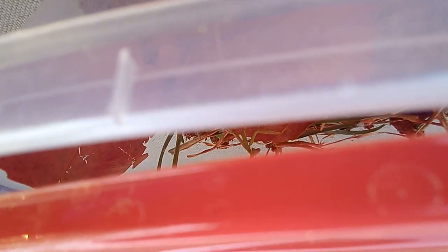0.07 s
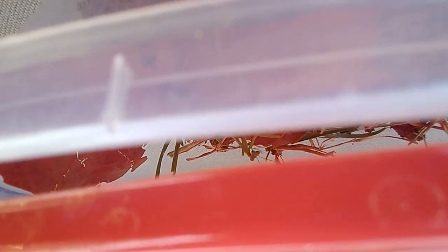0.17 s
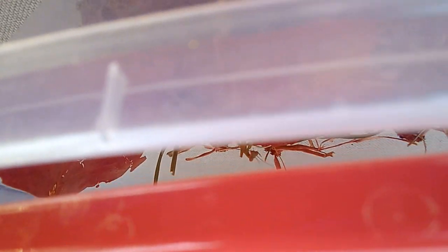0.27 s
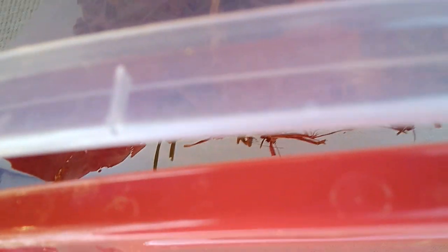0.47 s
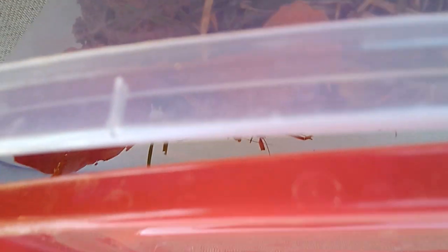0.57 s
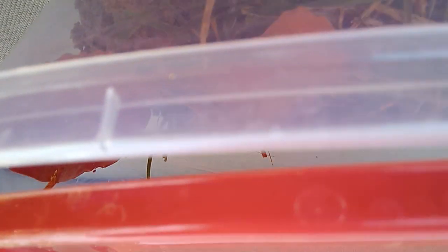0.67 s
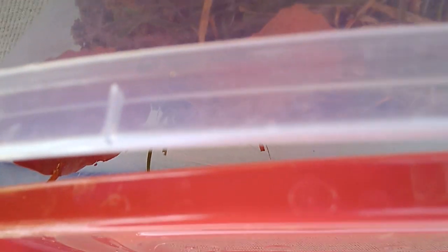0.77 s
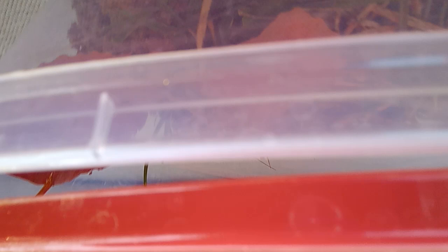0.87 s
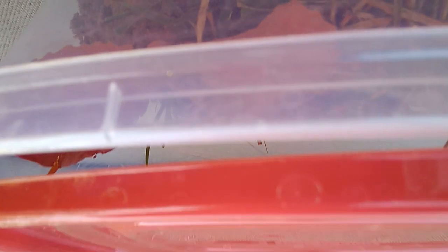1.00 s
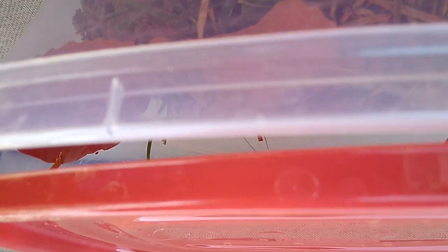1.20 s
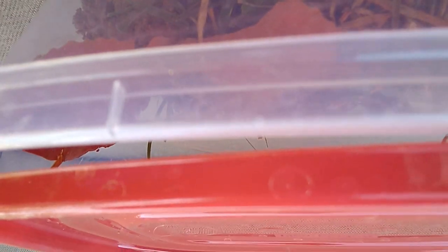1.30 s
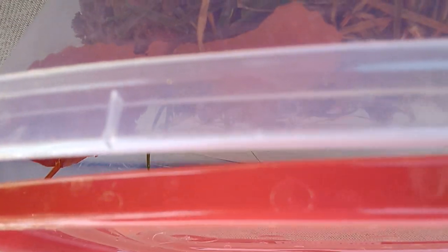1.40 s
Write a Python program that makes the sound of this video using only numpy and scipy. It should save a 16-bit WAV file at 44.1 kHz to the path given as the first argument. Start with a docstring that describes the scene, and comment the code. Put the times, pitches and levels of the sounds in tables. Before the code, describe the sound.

A plastic lid is pressed onto a tub close to the microphone. Two sharp snaps lead into soft hollow knocks and faint scraping, then two more snaps. Dry twigs tick faintly inside, over a low room hum.

```python
"""A plastic lid snaps and knocks as it is pressed and shifted on a plastic tub of dry twigs, close by.
The rim sticks and slips; each release is an impulse that excites damped modes of the wall and cavity.
Bending waves in the thin wall are dispersive, so the treble arrives ahead of the bass.
Between snaps the lid slides and creaks and the twigs rustle and tick, over a low room hum."""
import sys
import numpy as np
from scipy import signal
from scipy.fft import rfft, irfft
from scipy.io import wavfile
from scipy.ndimage import uniform_filter1d, minimum_filter1d

SR = 44100
rng = np.random.default_rng(int(sys.argv[2]) if len(sys.argv) > 2 else 0)


def inscribe(sig):
    """Save sig as 16-bit PCM at rate SR to the path in sys.argv[1].

    A 1-D sig is mono; a 2-D sig holds one channel per row.
    Samples are clipped to [-1, 1] before scaling.
    """
    pcm = np.round(np.clip(np.atleast_2d(sig).T, -1, 1) * 32767)
    wavfile.write(sys.argv[1], SR, pcm.astype(np.int16))


N = 63945
SIZE = 2 * N
FREQ = np.maximum(np.arange(N + 1) * SR / SIZE, 1e-3)
TIME = np.arange(N) / SR


def rim_snaps(wall, cavity, crack):
    """Stick-slip release: a first slip, then an impulse that thuds, rings the wall and cracks."""
    # (time [s], thud [dB], thud pitch [Hz], wall ring [dB], crack [dB], contact cutoff [Hz],
    #  lead of the first slip [s], its signed share [ratio])
    releases = [(0.218, 8, 1420, 1.5, 7, 12500, .00049, 0.46),
                (.2221, 14.5, 990, 5.5, 6.5, 8040, .00038, 0.23),
                (.2730, 8, 1300, -0.5, -2, 12100, 0.0005, 0.92),
                (0.3484, -12, 1920, -17, -5, 12100, 0.0012, 0.35),
                (.5609, -9.5, 1020, 3.5, -8, 6900, 0.000402, -0.21),
                (0.6722, -7.5, 1190, 0.5, -14, 6600, 0.00041, -0.16),
                (0.8486, -0.5, 1000, 6, 1.5, 9600, 0.000383, -0.24),
                (0.8506, 1, 940, 1, -1, 6240, 0.00019, -0.39),
                (1.0226, -6.5, 1480, 6, 0.5, 9700, .00038, -0.29),
                (1.0361, -6, 1620, 2.5, -1.5, 9800, 0.00039, -0.29)]
    spectrum = 0
    for s, thud_db, hz, ring_db, crack_db, top_hz, lead_s, slip in releases:
        thud = undb(thud_db) * (resonance(hz, width=1.31 * hz) + cavity) * rolloff(2.6 * hz)
        treble = undb(ring_db) * wall + undb(crack_db) * crack
        contact = 1 / np.sqrt(1 + (FREQ / top_hz) ** 6)
        spectrum += contact * (impulse(s) * (thud + treble) + impulse(s - lead_s) * slip * treble)
    return spectrum


def lid_knocks(wall, cavity):
    """Soft impact: a long contact of lid on tub puts little energy into the treble."""
    # (time [s], thud [dB], thud pitch [Hz], wall ring [dB])
    impacts = [(0.314, -17.5, 780, -44), (.3532, -5, 530, -38), (0.3569, -1, 1100, -13),
               (.3635, -6.5, 610, -35), (0.4168, -19, 856, -43), (0.4623, 2.5, 787, -42),
               (0.4708, -2, 477, -42), (0.5135, 0.5, 770, -8.5), (.5566, -1.5, 584, -38)]
    spectrum = 0
    for s, thud_db, hz, ring_db in impacts:
        thud = resonance(hz, width=0.44 * hz) * resonance(hz, width=2 * hz) + cavity
        spectrum += impulse(s) * (undb(thud_db) * thud + undb(ring_db) * wall)
    return spectrum * rolloff(hz=5300)


def tub_bumps():
    """Free decay: each soft bump of the shifting tub rings one low mode."""
    # (time [s], pitch [Hz], t60 [s], gain at resonance [dB])
    bumps = [(.345, 164, 0.14, 1), (0.357, 356, 0.14, 9.5), (0.4, 170, 0.089, 3), (.475, 335, 0.11, 0),
             (.513, 302, 0.13, 8.5), (.5566, 594, 0.038, 4), (0.788, 120, 0.15, 12.5),
             (1.156, 112, 0.071, 10.5)]
    return sum(impulse(s) * undb(db) * mode(hz, t60) * resonance(hz, hz) for s, hz, t60, db in bumps)


def twig_ticks(crack):
    """Impulse response: each faint twig tick takes the bright spectrum of the contact."""
    # (time [s], level [dB])
    ticks = [(.189, -34), (0.2859, -34), (.294, -41), (.319, -31), (.4178, -31), (.497, -42), (0.501, -46),
             (0.5363, -25), (.682, -26), (1.154, -28.5), (1.1755, -24.5), (1.207, -28.5)]
    return sum(impulse(s) * undb(db) for s, db in ticks) * crack


def container():
    """Dispersion: bending waves in the wall turn every contact into a very fast downward chirp."""
    # modes of the wall (frequency [Hz], t60 [s], gain at resonance [dB])
    wall_modes = [(2460, 0.0081, -5), (3290, 0.0096, -9.5), (3796, 0.0063, -1), (4440, 0.0033, 2.5),
                  (5790, 0.0051, -7.5), (6220, 0.0082, -7), (7150, 0.0052, -3), (8300, 0.0049, -21)]
    # spectrum of the crack at the contact (frequency [Hz], level [dB])
    crack_spectrum = [(200, -49), (2000, -33), (5000, -5), (7500, -7), (9200, 4), (9900, -2.5),
                      (10500, -23), (11500, -5), (13200, -31), (15000, -7), (16300, -29)]
    # radiation from the wall (frequency [Hz], gain [dB])
    radiation = [(60, -3), (200, 5), (850, -0.5), (1500, 2.5), (9400, -1.5), (10600, -5), (13000, -10.5),
                 (16000, -9)]
    wall = sum(undb(db) * mode(hz, t60) for hz, t60, db in wall_modes)
    cavity = undb(-7.5) * mode(hz=332, t60=0.0063)
    crack = colour(crack_spectrum)
    contacts = rim_snaps(wall, cavity, crack) + lid_knocks(wall, cavity) + tub_bumps() + twig_ticks(crack)
    travel_s = 0.000479  # across the wall at 1 kHz
    bending = np.exp(-4j * np.pi * travel_s * np.sqrt(1000 * FREQ)) * impulse(-travel_s / 2)
    return irfft(contacts * bending * colour(radiation))[:N]


def lid_slides():
    """Friction noise: fine slips excite the resonances of the lid as it drags over the rim."""
    # (time [s], rise [s], fall [s], level [dB])
    slides = [(.02, 0.026, .16, -78), (.353, 0.015, 0.022, -44.5), (.420, 0.005, 0.0044, -48.5),
              (.483, 0.018, 0.022, -55), (.501, 0.0069, .008, -47.5), (.537, 0.012, 0.019, -51),
              (.603, 0.036, .04, -50.5), (.648, 0.055, 0.076, -53), (1.17, 0.18, 0.12, -62.5),
              (1.33, 0.21, .2, -60)]
    # spectrum of the friction (frequency [Hz], level [dB])
    friction = [(300, -9), (550, -2.5), (950, -12.5), (2900, -9.5), (4100, -15.5), (6000, -20.5),
                (9000, -21), (10500, -38), (13000, -32), (16000, -49)]
    # (frequency [Hz], bandwidth [Hz], gain [dB])
    lid_modes = [(1584, 31, -1), (2945, 80, 1.5), (4130, 140, 5), (5780, 100, 6.5), (6600, 96, 6),
                 (8430, 470, 1.5)]
    body = 1 + sum(undb(db) * resonance(hz, width) for hz, width, db in lid_modes)
    return shaped_noise(micro_slips(), colour(friction) * body) * swells(slides)


def twig_rustle():
    """Friction noise: dry stalks brush the plastic in short bursts of tiny slips."""
    # (time [s], rise [s], fall [s], level [dB])
    rustles = [(.341, 0.019, .012, -52), (.3485, 0.0018, .002, -33), (.653, .01, 0.012, -54.5)]
    # spectrum of the brushing (frequency [Hz], level [dB])
    brushing = [(500, -5), (3000, -3.5), (6500, -8.5), (9300, 5), (11500, -10), (15500, -19)]
    return shaped_noise(micro_slips(), colour(brushing)) * swells(rustles)


def rim_creak():
    """Frictional oscillation: the dragging rim briefly sings a faint, unsteady rising note."""
    start_s, end_s = 0.595, 0.665
    start_hz, rise_hz = 461, 89
    progress = np.clip((TIME - start_s) / (end_s - start_s), 0, 1)
    waver = unit(uniform_filter1d(rng.standard_normal(N), size=200))
    hz = (start_hz + rise_hz * progress) * (1 + 0.04 * waver)
    return undb(-52) * np.sin(np.pi * progress) * np.sin(2 * np.pi * np.cumsum(hz) / SR)


def room():
    """Superposition: steady tones of a machine hum add to broadband rumble and faint hiss."""
    # (frequency [Hz], relative level [dB])
    rumble_spectrum = [(15, -48), (25, -25), (59, -12), (108, 1), (210, -7.5), (243, -7.5), (267, -6.5),
                       (330, -5), (419, -17), (442, -22.5), (600, -33.5), (780, -67), (1320, -120)]
    # (frequency [Hz], relative level [dB])
    hiss_spectrum = [(290, -29), (500, -7), (807, -9.5), (960, -6.5), (1930, -14.5), (2610, -16),
                     (3440, -19.5), (8960, -26), (16000, -40)]
    # (frequency [Hz], rms level [dB])
    hum_tones = [(75.4, -59.5), (240, -55.5), (324, -65), (413, -66)]
    rumble = undb(-50.5) * shaped_noise(rng.standard_normal(N), colour(rumble_spectrum))
    hiss = undb(-62.5) * shaped_noise(rng.standard_normal(N), colour(hiss_spectrum))
    hum = sum(undb(db) * np.sin(2 * np.pi * (hz * TIME + rng.random())) for hz, db in hum_tones)
    return rumble + hiss + np.sqrt(2) * hum


def undb(db):
    """Decibels to amplitude ratio."""
    return 10 ** (np.asarray(db) / 20)


def unit(x):
    """Normalisation to rms 1."""
    return x / np.std(x)


def colour(points):
    """Minimum-phase response through (frequency [Hz], gain [dB]) points, falling beyond both ends."""
    hz, db = np.array(points).T
    edge_hz = np.r_[hz[0] / 2, hz, hz[-1] * 2]
    edge_db = np.r_[db[0] - 20, db, db[-1] - 60]
    magnitude = undb(np.interp(np.log(FREQ), np.log(edge_hz), edge_db))
    cepstrum = irfft(np.log(magnitude))
    return np.exp(rfft(np.r_[cepstrum[0], 2 * cepstrum[1:N]], SIZE))


def resonance(hz, width):
    """Response of a damped oscillator, gain 1 at its centre."""
    return 1 / (1 + 1j * (FREQ ** 2 - hz ** 2) / (FREQ * width))


def mode(hz, t60):
    """A resonance whose bandwidth is inversely proportional to its decay time."""
    return resonance(hz, np.log(1000) / (np.pi * t60))


def rolloff(hz):
    """Second-order low-pass magnitude."""
    return 1 / np.hypot(1, (FREQ / hz) ** 2)


def impulse(s):
    """Spectrum of an impulse at time s: delay is linear phase."""
    return np.exp(-2j * np.pi * FREQ * s)


def shaped_noise(noise, response):
    """Linear filtering by spectral multiplication, scaled to rms 1."""
    return unit(irfft(rfft(noise, SIZE) * response)[:N])


def swells(rows):
    """Envelope of overlapping rises and falls: incoherent sounds add in power."""
    power = 0
    for s, rise, fall, db in rows:
        width_s = np.where(TIME < s, rise, fall)
        power += (undb(db) * np.exp(-2 * ((TIME - s) / width_s) ** 2)) ** 2
    return np.sqrt(power)


def micro_slips(per_s=5600):
    """Shot noise: dense, independent slips of uneven size."""
    slipping = rng.random(N) < per_s / SR
    return slipping * rng.standard_normal(N)


def scene():
    """Sound pressures add at one close microphone."""
    return (container() + lid_slides() + twig_rustle() + rim_creak() + room())[None]


def record(dry):
    """Compression: a gentle look-ahead limiter ducks the loudest snaps; a low-pass cuts the top."""
    threshold_db, ratio, release_s, top_hz = -19, 1.517, 0.02, 16400
    ahead = int(0.02 * SR)
    excess = np.maximum(np.log(np.abs(dry[0]) / undb(threshold_db) + 1e-9), 0)
    release = np.exp(-TIME / release_s)
    held = np.maximum.accumulate(excess / release) * release
    ducking = uniform_filter1d(minimum_filter1d(-held, 2 * ahead), ahead)
    gain = np.exp(ducking * (1 - 1 / ratio))
    return signal.sosfilt(signal.ellip(8, 0.2, 70, top_hz, fs=SR, output="sos"), dry * gain)


dry = scene()
out = record(dry)
inscribe(out)
```